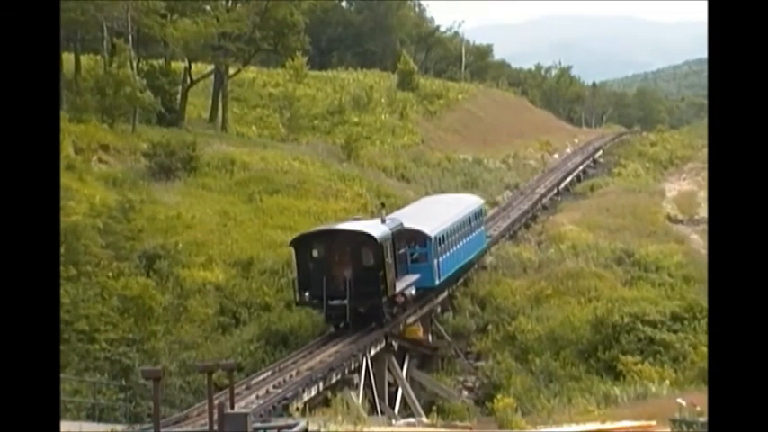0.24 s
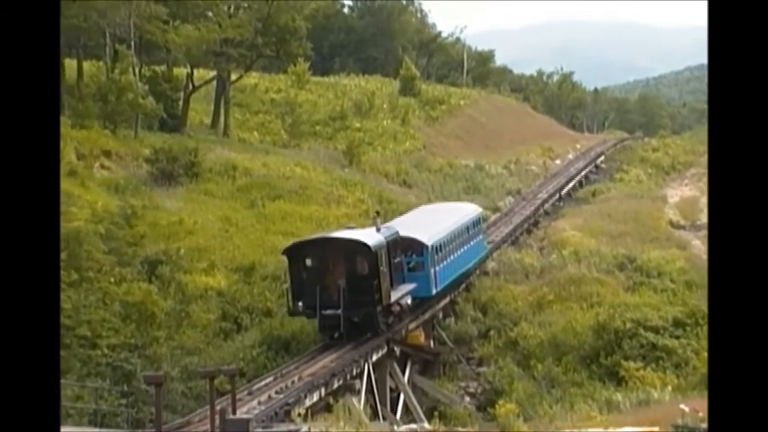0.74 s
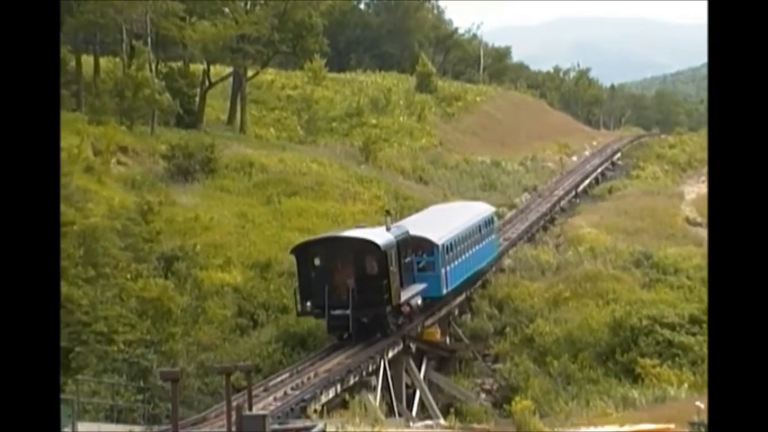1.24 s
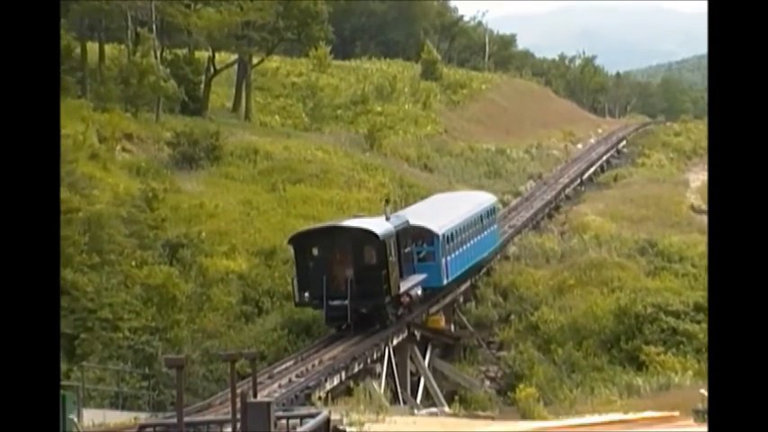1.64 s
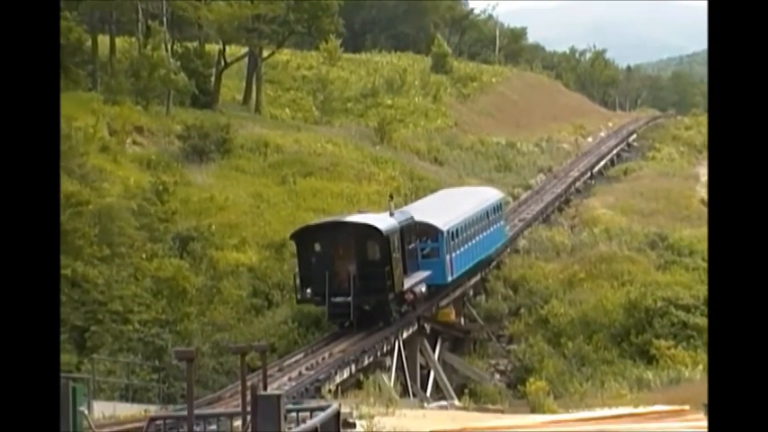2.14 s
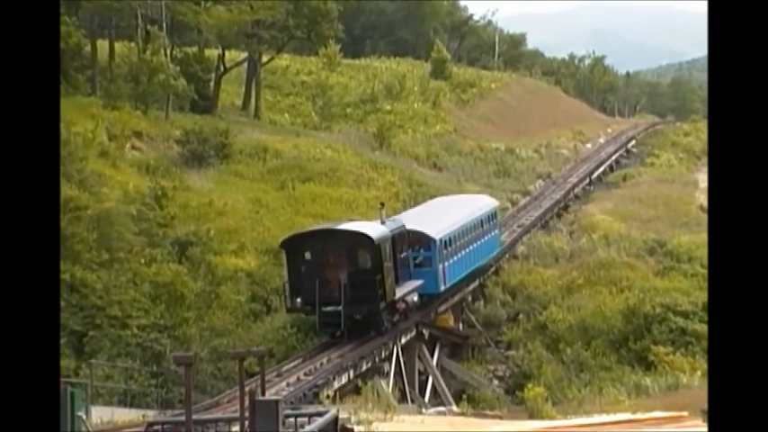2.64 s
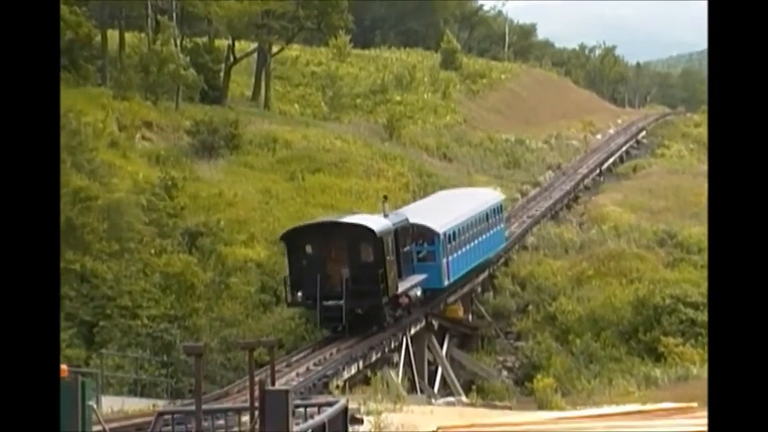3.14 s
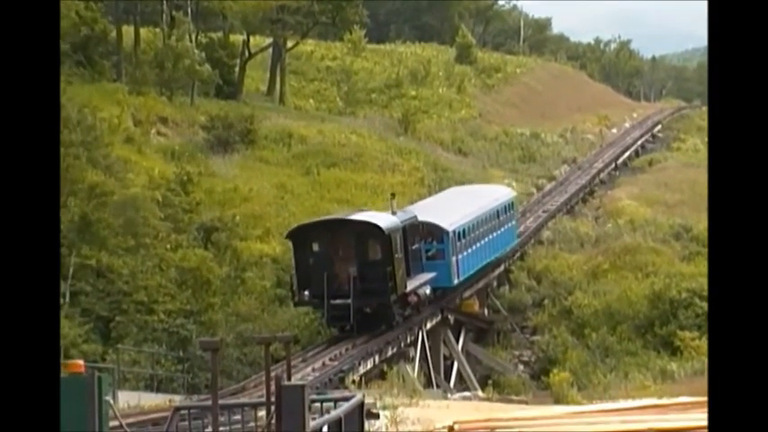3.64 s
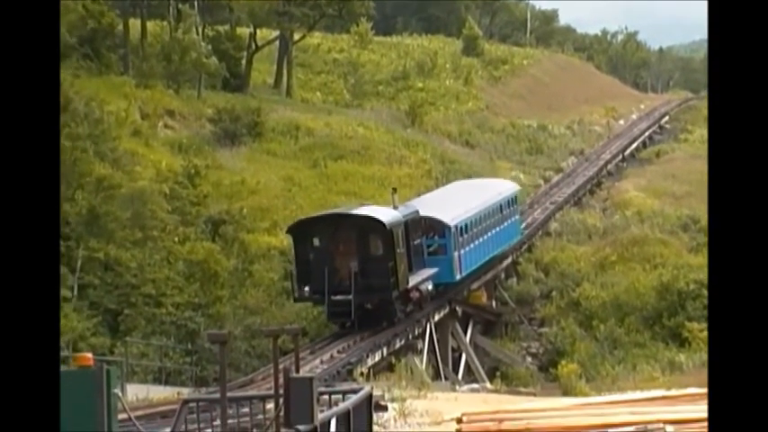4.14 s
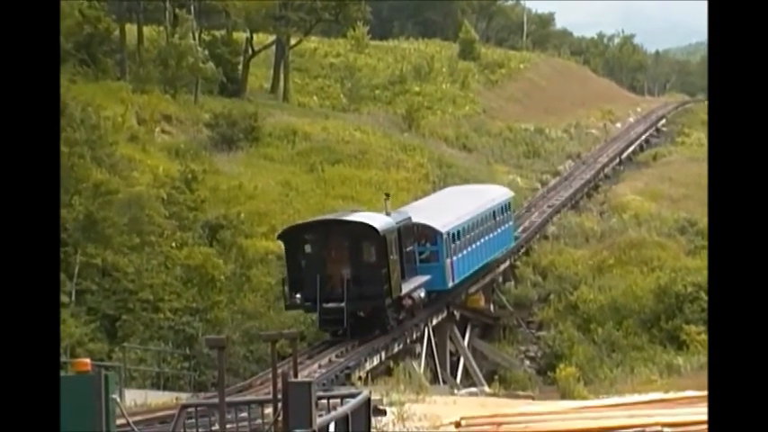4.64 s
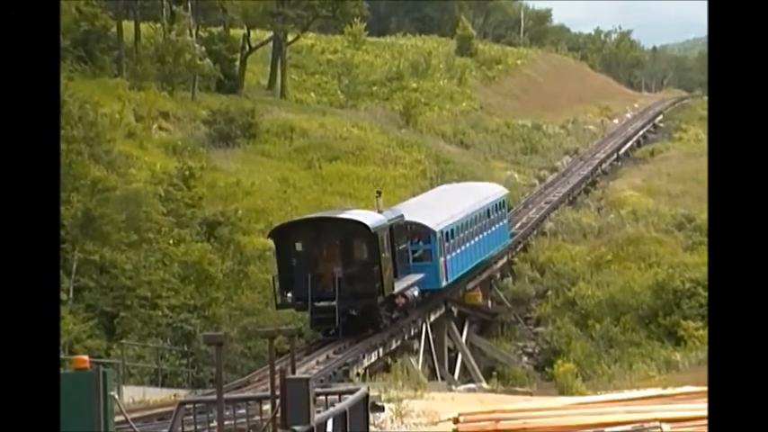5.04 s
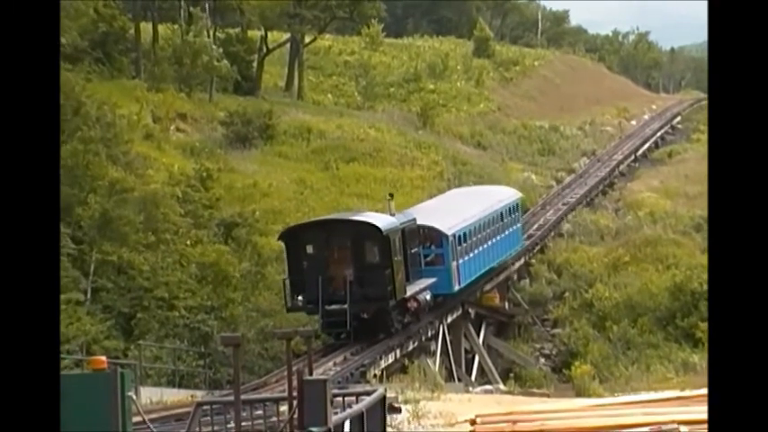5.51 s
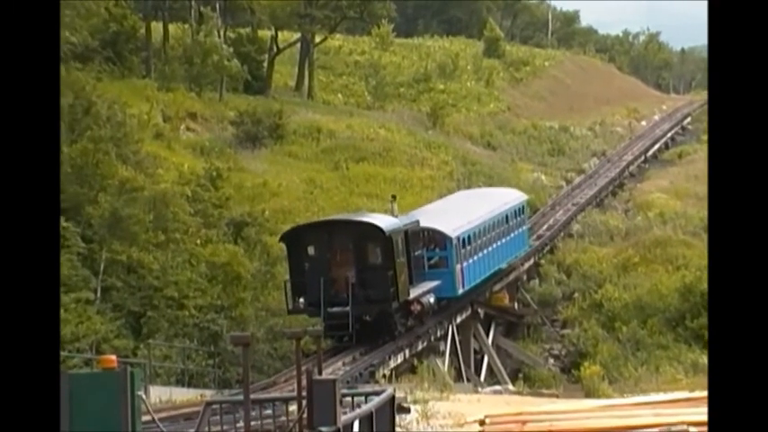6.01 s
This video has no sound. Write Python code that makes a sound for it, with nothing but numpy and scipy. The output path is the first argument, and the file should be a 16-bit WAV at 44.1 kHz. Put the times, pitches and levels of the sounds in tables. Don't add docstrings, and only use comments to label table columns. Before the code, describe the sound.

A small diesel cog train rolls on an open hillside trestle, heard close from beside the line. A continuous rough roar and cog rattle sit over low rumble and a steady engine and gear hum. Loose steel chinks and clanks, metal sings briefly, and leaking air hisses in puffs. The hum sags later, the rattle grows slightly, and a loud ring comes near five seconds. The microphone level ducks after hard jolts.

```python
import sys
import numpy as np
from scipy import signal
from scipy.fft import rfft, irfft, dct, next_fast_len
from scipy.io import wavfile
from scipy.ndimage import uniform_filter1d, map_coordinates

SR = 44100
rng = np.random.default_rng(int(sys.argv[2]) if len(sys.argv) > 2 else 0)


def wrap_up_sound(samples):
    columns = np.atleast_2d(samples).T
    tamed = np.clip(columns, -1, 1)
    steps = np.round(tamed * 32767).astype(np.int16)
    wavfile.write(sys.argv[1], SR, steps)


def makeup_ratio(level_db):
    decades = np.asarray(level_db, float) / 20
    return 10 ** decades


N = 276507
T = np.arange(N) / SR


def unit(x):
    return x / np.sqrt(np.mean(x ** 2) + 1e-20)


def along(points, hz):
    f, v = np.transpose(points)
    return np.interp(np.log(hz + 1), np.log(f + 1), v)


def curves(rows):
    s, *cols = np.transpose(rows)
    return [np.interp(T, s, c) for c in cols]


def swells(rows):
    return sum(db * np.exp(-((T - s) / width) ** 2) for s, db, width in rows)


def wobble(rate):
    coarse_t = T[::32]
    knots = rng.standard_normal(N // 400)
    steps = map_coordinates(knots, [coarse_t * np.clip(rate, 0, 100)])
    return np.interp(T, coarse_t, steps)


def filtered(x, response):
    m = next_fast_len(N + 8192)
    return irfft(rfft(x, m) * response(np.fft.rfftfreq(m, 1 / SR)), m)[..., :N]


def tone(turns, db, flutter_db, slip):
    phase = 2 * np.pi * turns + slip * wobble(6)
    return np.sqrt(2) * makeup_ratio(db + flutter_db * wobble(9)) * np.sin(phase)


# frequency in Hz, likeness from 0 to 1.
ALIKE = [(30, 0.78), (80, 0.94), (200, 0.97), (400, 0.98), (1000, 0.99), (2500, 0.96), (5000, 0.87),
         (10000, 0.13)]


def rush(gain, patchy_db, alike=lambda hz: along(ALIKE, hz)):
    z = signal.stft(rng.standard_normal((2, N)), nperseg=512)[2]
    field = uniform_filter1d(rng.standard_normal(z.shape[1:]), size=6, axis=0)
    field = uniform_filter1d(field, size=12, axis=1)
    pair = signal.istft(z * makeup_ratio(patchy_db * unit(field)), nperseg=512)[1][:, :N]

    def middle_and_side(hz):
        turn = np.arccos(np.clip(alike(hz), -1, 1)) / 2
        return gain(hz) * [np.cos(turn), np.sin(turn)]

    mid, side = filtered(pair, middle_and_side)
    return unit(np.array([mid + side, mid - side]))


# frequency in Hz, level in dB.
HISS = [(3500, -25), (5500, 1.5), (6300, -2.5), (7300, 3), (8200, -4.5), (9000, -5), (10000, -6.5),
        (11000, -15), (11600, -16.5), (12500, -57)]
# start in seconds, length in seconds, rise in dB.
PUFFS = [(0.694, .34, 2.5), (1.2, .2, 0.5), (1.602, 0.2, 3.5), (2.057, .53, 7), (2.676, .14, 4),
         (3.04, 0.12, 1.5), (3.48, .17, 2), (4.418, 0.071, 2.5), (4.661, 0.28, 5), (5.1, 0.3, 3.5),
         (5.92, .15, 3)]


def leak():
    edge = lambda s: np.clip((T - s) / 0.047 + .5, 0, 1)
    puff_db = sum(rise_db * (edge(s) - edge(s + length)) for s, length, rise_db in PUFFS)
    pan_db = 2.2 * wobble(7)
    hiss = rush(lambda hz: makeup_ratio(along(HISS, hz)), patchy_db=1.5, alike=lambda hz: 0.57 + 0 * hz)
    top = filtered(hiss, lambda hz: 1 / (1 + (10000 / (hz + 1)) ** 20))
    hiss = hiss + (makeup_ratio(0.4 * puff_db) - 1) * top
    level_db = -41.5 + puff_db + 0.67 + 0.61 * wobble(25) + .9 * wobble(15)
    return makeup_ratio(level_db + [pan_db / 2 - 0.9, 1.0 - pan_db / 2]) * hiss


def chinks():
    when, octave, size, phase = rng.random((900, 4)).T
    t = np.arange(2400) / SR
    hz = 700 * 2 ** (2.6 * octave[:, None])
    envelope = makeup_ratio(-60 * t / 0.12) * (1 - np.exp(-t / 0.01))
    rings = envelope * np.sin(2 * np.pi * (hz * t + phase[:, None]))
    rings = rings * makeup_ratio(-25.5 - 3.5 * np.log2(hz / 700) - 2.43 * np.log(size[:, None] + 0.0012))
    places = (when * N).astype(int)[:, None] + np.arange(len(t))
    return np.bincount(places.ravel(), rings.ravel())[:N]


# start in seconds, burst level in dB, burst length in seconds, ring level in dB.
CLANKS = [
    (1.63, -33, .03, -54),
    (1.67, -25, .04, -49),
    (3.678, -38, .05, -33),
    (4.03, -40, .04, -42),
    (4.44, -29, .03, -48),
    (4.926, -38, .03, -38),
    (5.132, -30, .06, -18),
    (5.198, -26, 0.058, -46),
    (5.927, -21, 0.024, -44),
]


def clanks():
    link_hz, link_t60 = 4200, .14
    out, t = np.zeros(N + SR), np.arange(SR // 4) / SR
    for s, burst_db, length, ring_db in CLANKS:
        bright_noise = np.diff(rng.standard_normal(len(t) + 1))
        burst = makeup_ratio(burst_db) * bright_noise * t / length * 4 * np.exp(1 - t / length * 4)
        ring = makeup_ratio(ring_db - 60 * t / link_t60) * np.sin(2 * np.pi * link_hz * t)
        ring = ring * (1 - np.exp(-t / .004))
        out[round(s * SR):][:len(t)] += burst + ring
    return filtered(out[:N], lambda hz: 1 / (1 + (hz / 6200) ** 6))


# start in seconds, end in seconds, pitch in Hz, rms level in dB.
SINGING = [(0.048, .5, 547, -32), (0.698, 1.75, 546.3, -34.5), (0.218, 0.294, 2680, -32),
           (0.735, 0.783, 2710, -25), (1.498, 2.302, 1120, -32), (1.95, 2.3, 1020, -27),
           (3.4, 3.898, 628, -26.5), (4.95, 5.35, 582, -35), (5.123, 5.23, 1304, -24),
           (5.55, 6.1, 572, -29), (5.652, 6.305, 702, -24.5)]


def singing():
    total = 0
    for start, end, hz, db in SINGING:
        swell = np.sin(np.pi * np.clip((T - start) / (end - start), 0, 1))
        turns = hz * T + .16 * wobble(28)
        total = total + swell * tone(turns, db, flutter_db=3.0, slip=0.98)
    return total


# time in seconds, peak in dB, gain change in
# dB, recovery in seconds.
JOLTS = [(0.062, -6, -3.5, .06), (.468, -9, -3.5, .15), (.589, -7, -1, .08), (.826, -7, -5.5, 0.025),
         (1.186, -7, -1, .1), (1.384, -8, -2.5, 0.043), (1.737, -5, -1, 0.094), (2.391, -11, -4.5, 0.072),
         (2.582, -11, -3.5, 0.14), (2.798, -8, -0.5, .06), (3.296, -7, -1.5, 0.13), (3.503, -3, -2.5, .04),
         (3.66, -9, 1, .12), (3.996, -16, 0, 0.13), (4.222, -10, -0.5, 0.055), (4.823, -6, -1, 0.083),
         (5.225, 1, -4.5, 0.12), (6.044, -4, -2, .12)]


def jolts():
    out, u = np.zeros(N), np.arange(-40, 40) / SR / 0.0001
    for s, db, *_ in JOLTS:
        out[round(s * SR) - 40:][:80] -= makeup_ratio(db) * np.exp(-u ** 2)
    return out


# frequency in Hz, level in dB.
RUMBLE = [(15, -20.5), (30, -1), (60, 1.5), (110, 4), (150, 4), (200, 5), (260, -1.5), (320, -6.5),
          (450, -16), (700, -51.5)]
# time in seconds, rise in dB, half width in seconds.
BENTS = [
    (.42, 4, .3),
    (1.6, 0.5, 0.25),
    (2.85, 3.5, 0.43),
    (4.0, 1, 0.28),
    (5.1, 2, .35),
    (6.15, 3.5, 0.38),
]


def trestle_rumble():
    return makeup_ratio(-23 + swells(BENTS) + 3) * rush(lambda hz: makeup_ratio(along(RUMBLE, hz)), patchy_db=0.87)


# pitch in Hz, width in Hz, level in dB on the far side, level in dB on the near side.
PANELS = [(544.7, 9.6, 3.5, -17), (627, 13, 0, -14), (582, 4.1, -13.5, 0.5), (702, 7.9, -13, -9),
          (1040, 40, -9.5, -10), (1105, 31, -2.5, -6.5), (1342, 25, -2.5, -19), (1530, 40, -7.5, -9.5)]


def frame(spectrum, column):
    def gain(hz):
        peaks = sum(makeup_ratio(2 * row[column]) / (1 + (2 * (hz - row[0]) / row[1]) ** 2) for row in PANELS)
        return np.sqrt(makeup_ratio(2 * along(spectrum, hz)) + peaks)
    return gain


# frequency in Hz, level in dB.
ROAR_FAR = [(200, -7), (320, -7), (460, -9.5), (550, -2), (640, -2), (850, -9.5), (1030, -2.5),
            (1190, -7.5), (1360, -7.5), (1600, -10), (2200, -18), (3500, -90)]
# frequency in Hz, level in dB.
ROAR_NEAR = [(200, -17.5), (320, -8), (420, -6), (560, -3.5), (690, -2.5), (820, -10), (960, -2.5),
             (1300, -7), (1600, -12), (2200, -19), (3500, -90)]
TURN = (3.5, 5.15)


def frame_roar(lurch_db, throb, shake):
    near = np.interp(T, TURN, [0, 1])
    far_side = rush(frame(ROAR_FAR, column=2), patchy_db=-1.06)
    near_side = rush(frame(ROAR_NEAR, column=3), patchy_db=0.2)
    roar = np.sqrt(1 - near) * far_side + np.sqrt(near) * near_side
    return makeup_ratio(-18.5 + lurch_db + 0.68 * throb + 0.42 * shake + 0.56 * wobble(45)) * roar


# frequency in Hz, level in dB.
RATTLE = [(800, -39), (1300, -7.5), (1660, -1.5), (1880, -6.5), (2110, -2.5), (2350, -8), (2640, -3.5),
          (2880, -6.5), (4000, -11), (4830, -13.5), (5880, -23.5), (7000, -22), (8500, -33), (11000, -92.5)]


def rack_rattle(lurch_db, throb, shake):
    level_db = -22.3 + 2.5 * T / T[-1] + .9 * lurch_db - 0.8
    tremble_db = 0.56 * throb + 0.27 * shake + 0.44 * wobble(60) + 0.63 * wobble(16)
    return makeup_ratio(level_db + tremble_db) * rush(lambda hz: makeup_ratio(along(RATTLE, hz)), patchy_db=0.78)


# time in seconds, rise in dB, half width in seconds.
LURCHES = [(.52, 2.5, .1), (1.02, 1.4, 0.16), (1.6, 2, 0.12), (2.17, 2, 0.18), (2.58, 2.1, 0.17),
           (3.15, 1.2, 0.1), (3.53, 3, 0.074), (3.96, 1.5, .06), (4.2, .5, 0.054), (5.2, 4, 0.13),
           (5.38, 2, 0.061), (5.61, 1.5, 0.066), (5.81, 1, 0.033), (5.94, 1, .02), (6.18, 0.5, 0.025)]


def running(shaft):
    lurch_db = swells(LURCHES)
    throb, shake = .5 * np.cos(2 * np.pi * 3 * shaft), wobble(10)
    return trestle_rumble() + frame_roar(lurch_db, throb, shake) + rack_rattle(lurch_db, throb, shake)


# time in seconds, pitch in Hz, load on the gears from 0 to 1.
SPEED = [
    (0, 94.4, 1),
    (3.4, 94.17, 0.99),
    (3.9, 93.26, 0.65),
    (4.8, 89.8, 0),
    (5.4, 89.1, 0.44),
    (6.27, 88.4, 0.4),
]
GEAR_RATIOS = [1, 2, 2.175, 2.447, 4.35]
# rms level in dB loaded,
# rms level in dB unloaded, beat depth in dB, beat period in seconds, time of a crest in seconds.
GEARS = [(-21, -27, 0.8, 1.3, 1.9), (-22.5, -31.5, 2, 1.24, 1.47), (-22.5, -33, 4, 1.32, 0.81),
         (-27, -26.5, 2.5, 1.684, 1.64), (-34, -42, 2.5, 2.1, 1.3)]


def drive_train():
    hz, load = curves(SPEED)
    turns = np.cumsum(hz) / SR
    total = 0
    for ratio, (on_db, off_db, beat_db, period, crest) in zip(GEAR_RATIOS, GEARS):
        beat = beat_db * np.cos(2 * np.pi * (T - crest) / period)
        level_db = off_db + load * (on_db - off_db) + beat
        total = total + tone(ratio * turns, level_db, flutter_db=.8, slip=.15)
    return total


# cycles per shaft turn, rms level in dB.
ENGINE_ORDERS = [(1, -40), (2, -40), (3, -44), (8.15, -31.5), (13.8, -38.5), (15, -37)]
# time in seconds, rise in dB, half width in seconds.
KICKS = [
    (.22, 7, .3),
    (.95, 1, .3),
    (1.7, 7.5, .3),
    (3.6, 4.5, 0.45),
    (4.5, 8.5, 0.22),
    (5.1, 9.5, 0.19),
    (6.0, 8, .2),
]


def engine():
    hz = 72.73 + .7 * np.minimum(T / 3.936, 1)
    shaft = np.cumsum(hz / 4) / SR
    orders = sum(tone(k * shaft, level, flutter_db=1.0, slip=0.62) for k, level in ENGINE_ORDERS)
    idle = tone(4 * shaft, -29.5 + swells(KICKS), flutter_db=1.5, slip=.4)
    return idle + orders, shaft


# frequency in Hz, left minus right in dB.
LEAN = [(60, -3), (110, 0.5), (190, 0), (340, 0.5), (600, 0.5), (1080, 0.5), (1920, 0), (3420, 0),
        (6100, 1), (10900, -4.0)]
# time in seconds, left minus right in dB.
BEARING = [
    (0, 1.5),
    (1.9, 1),
    (2.4, -1),
    (2.8, 1.5),
    (3.9, 0.7),
    (4.4, 3.5),
    (5.2, 0),
    (5.6, 2.5),
    (6.27, 1.7),
]


def scene():
    hum, shaft = engine()
    train = leak_free = hum + drive_train() + jolts() + clanks() + chinks() + singing() + running(shaft)
    train = filtered(leak_free, lambda hz: makeup_ratio((along(LEAN, np.minimum(hz, 6000)) - .6) / [[2], [-2]]))
    pan_db, = curves(BEARING)
    return makeup_ratio([pan_db / 2, -pan_db / 2]) * train + leak()


# frequency in Hz, step in dB.
COARSE = [(1000, -60), (5000, -45), (7000, -33), (8500, -25), (10000, -25), (11500, -28)]


def treble_blips(x, size=2048, lead=1240):
    half, pad = size // 2, 2 * size - lead
    window = np.sin(np.pi * (np.arange(2 * size) + .5) / (2 * size))
    x = np.pad(x, ((0, 0), (pad, 3 * size - (N + pad) % size))).reshape(len(x), -1, size)
    blocks = np.concatenate([x[:, :-1], x[:, 1:]], axis=2) * window
    a, b, c, d = np.split(blocks, 4, axis=2)
    folded = np.concatenate([-c[..., ::-1] - d, a - b[..., ::-1]], axis=2)
    lines = dct(folded, type=4, norm="ortho")
    treble_db = 10 * np.log10(np.mean(lines[..., 700:900] ** 2, axis=(0, 2))[:, None] + 1e-9)
    step_db = along(COARSE, np.arange(size) * SR / (2 * size))
    step = makeup_ratio(step_db + 0.42 * (treble_db - np.median(treble_db)))
    folded = dct(np.round(lines / step) * step, type=4, norm="ortho")
    u, v = folded[..., :half], folded[..., half:]
    blocks = np.concatenate([v, -v[..., ::-1], -u[..., ::-1], -u], axis=2) * window
    joined = blocks[:, 1:, :size] + blocks[:, :-1, size:]
    return joined.reshape(len(x), -1)[:, pad - size:][:, :N]


def low_pass(x):
    return signal.sosfilt(signal.butter(12, 11470, fs=SR, output="sos"), x)


def record(dry):
    drop_db = np.zeros(N)
    for s, _, db, back in JOLTS:
        first = round(s * SR) + 30
        after = T[first:][:SR] - s
        drop_db[first:][:SR] += db * np.exp(-after / back)
    flattened = np.clip(makeup_ratio(drop_db) * dry, -1, 1)
    return low_pass(treble_blips(flattened))


dry = scene()
out = record(dry)
wrap_up_sound(out)
```